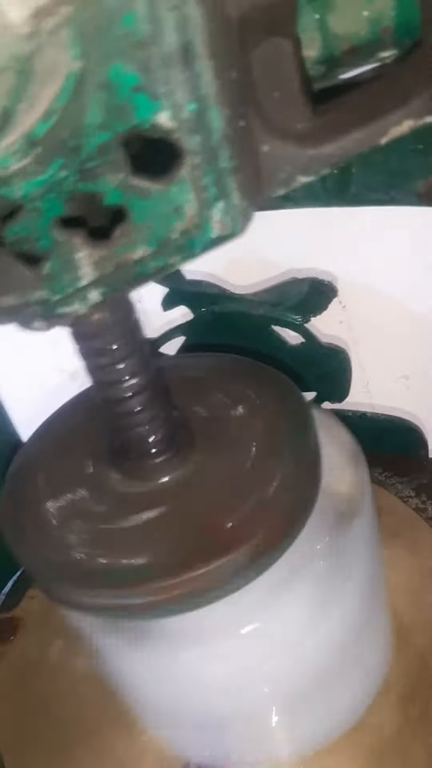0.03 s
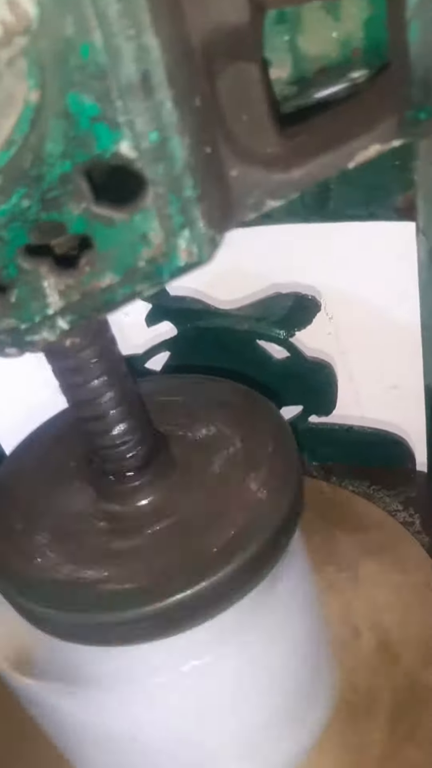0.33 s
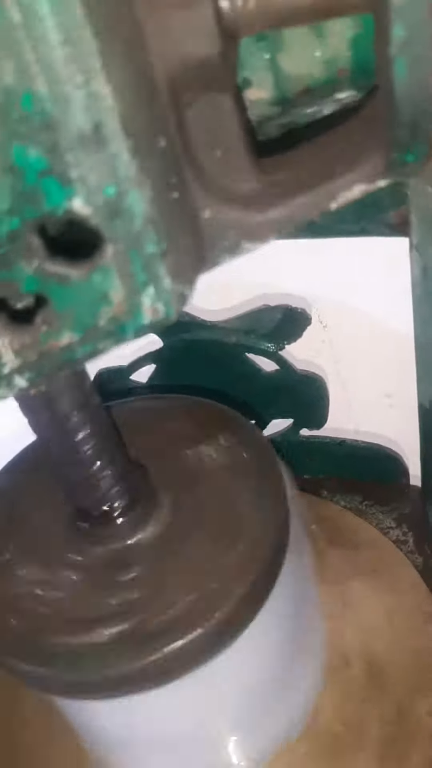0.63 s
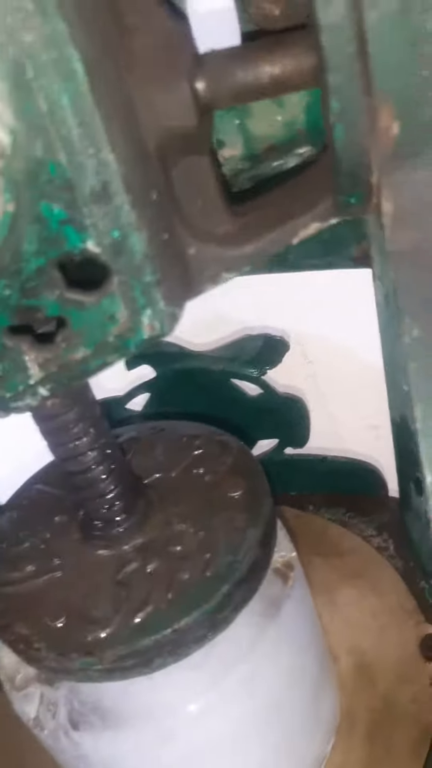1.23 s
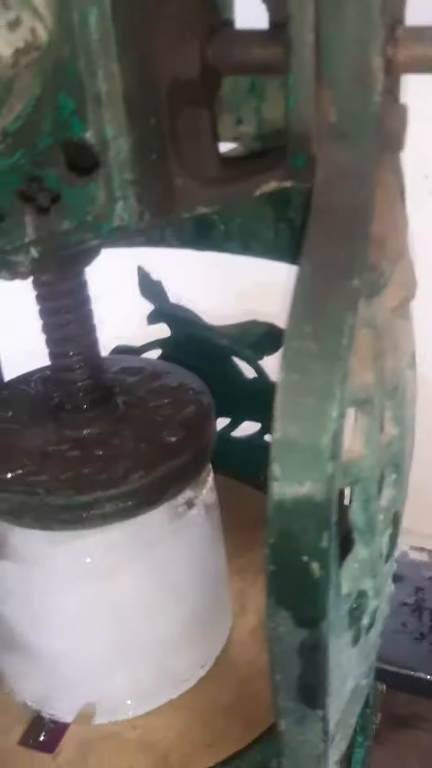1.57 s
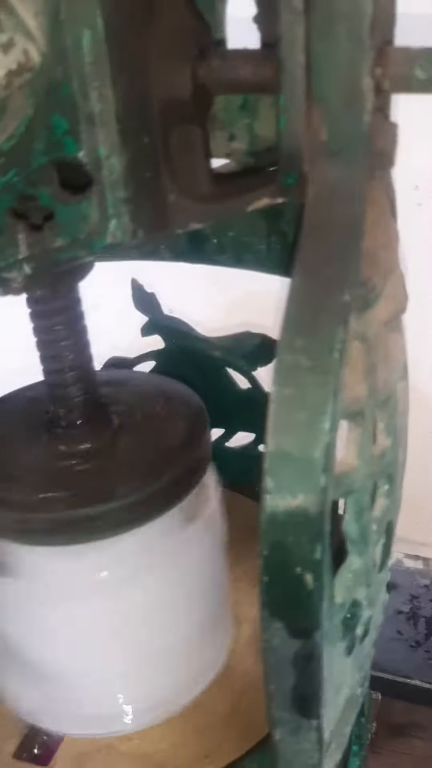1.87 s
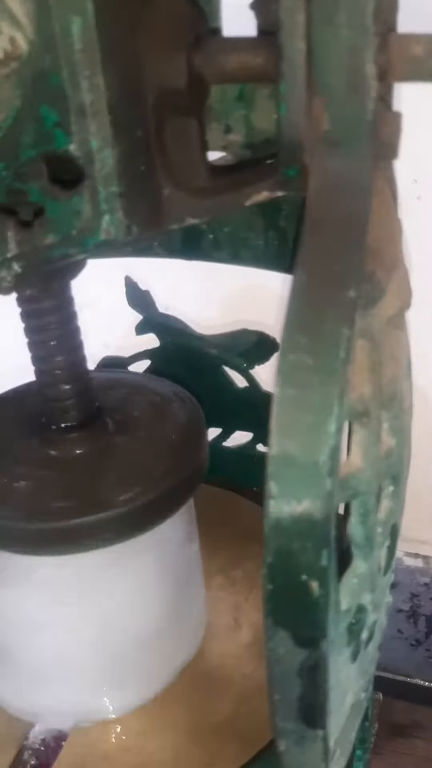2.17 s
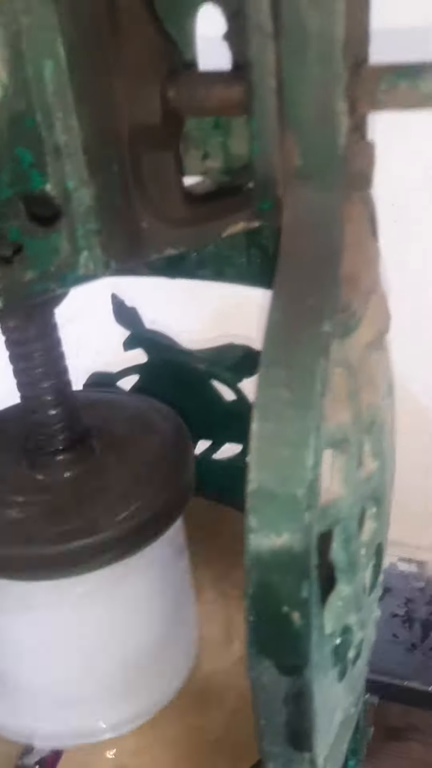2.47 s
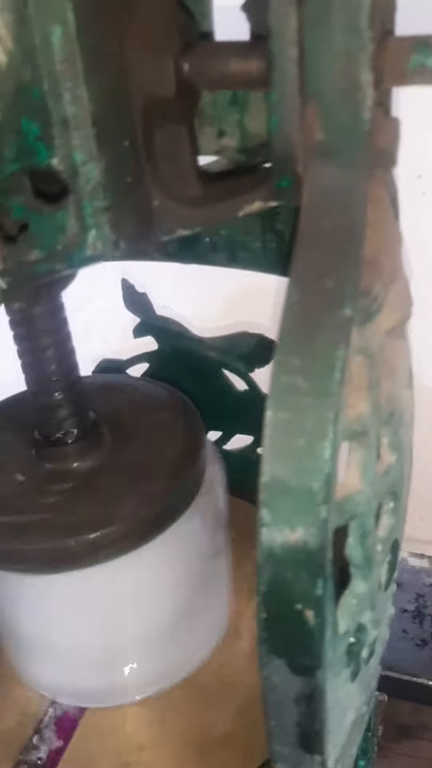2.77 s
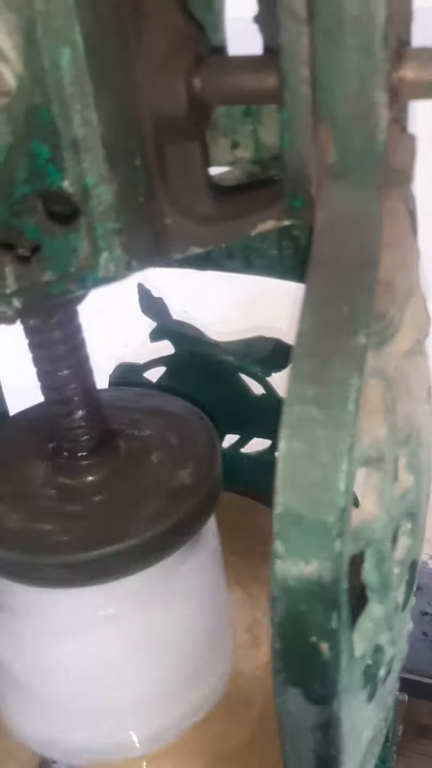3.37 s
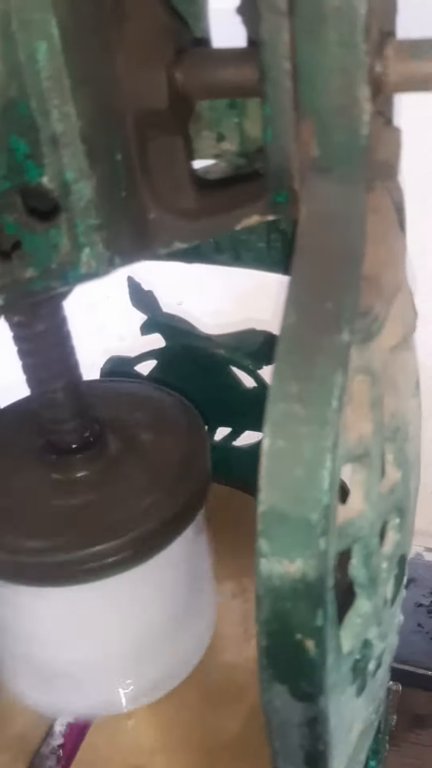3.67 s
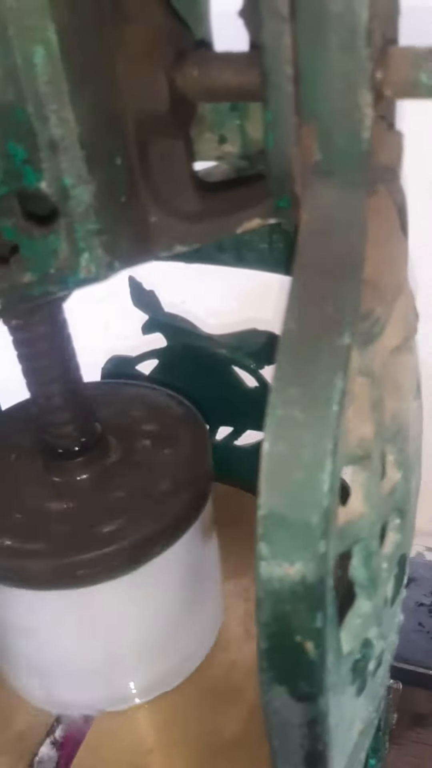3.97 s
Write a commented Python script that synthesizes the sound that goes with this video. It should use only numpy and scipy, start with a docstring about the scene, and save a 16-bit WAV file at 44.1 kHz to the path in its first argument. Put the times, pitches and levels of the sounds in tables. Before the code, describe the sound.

A hand-cranked ice shaver scrapes a block of ice, pauses briefly, then scrapes again.

```python
"""Shaving ice by hand

A hand-cranked cast-iron shaver spins a block of ice over its blade: a dense rain of tiny fractures
that swells where the ice bites, with chips and squeaks. The crank stops, the loose gears knock and
the block rubs faintly; then the blade catches again. Just before that, a finger covers the right
microphone port (its sound hole), muffling it and rumbling against it. The room is quiet."""
import sys
import numpy as np
from scipy import signal
from scipy.fft import rfft, irfft, next_fast_len
from scipy.io import wavfile

SR = 44100
rng = np.random.default_rng(int(sys.argv[2]) if len(sys.argv) > 2 else 0)


def wav_out(sig):
    """Save sig, one row per channel (or a flat mono array), as 16-bit PCM at SR to the path in sys.argv[1]."""
    wavfile.write(sys.argv[1], SR, np.round(np.clip(np.atleast_2d(sig).T, -1, 1) * 32767).astype(np.int16))


N = 176400
TIME = np.arange(N) / SR
COVER_S = 1.6565  # when the finger lands
BASS_CUT_HZ = 220  # knocks and squeaks fade below this pitch

# Pitches at which frame, tray and blade ring: pitch_hz, width_hz, first_lift_db, second_lift_db
RESONANCES = [(315, 4.8, 0.5, 5), (730, 79, 6, 6.5), (830, 120, 4.5, 1.5), (1073, 23, 9.5, -5),
              (1217, 82, 10, 4), (1514, 160, 10, 6), (3267, 70, 7, 3.5), (4380, 100, -1.5, 7.5),
              (4936, 46, 6, 3), (5150, 45, 7.5, 6.5), (12120, 300, 4, 3.5)]
# Tone of the second spell of scraping and of the finger's tap: pitch_hz, level_db
SECOND_COLOUR = [(60, -35), (130, -29.5), (200, -23.5), (290, -10), (420, -6), (620, -8), (850, -2.5),
                 (1020, -7), (1400, -6.5), (2000, -7), (2800, -7), (4700, -2), (6400, -4.5), (7100, -12.5),
                 (7600, -23.5), (8700, -26), (10200, -20.5), (16000, -24)]


def cranking():
    """The crank turns the ice over the blade in two spells, each with its own tone."""
    # How hard the blade bites in each spell: time_s, level_db
    first_bite = [(0.0, -29), (0.062, -37.5), (0.082, -41.5), (0.152, -22), (0.212, -36.5), (0.25, -33),
                  (0.346, -29), (0.36, -20), (0.374, -31), (0.408, -27.5), (0.44, -38), (0.515, -25.5),
                  (0.535, -26.5), (0.565, -23), (0.61, -19), (0.65, -26.5), (0.684, -32), (0.756, -18.5),
                  (0.768, -22), (0.788, -18), (0.835, -42.5)]
    second_bite = [(1.69, -45), (1.7, -23.5), (1.76, -31.5), (1.87, -30.5), (1.91, -17.5), (1.96, -25.5),
                   (2.0, -28), (2.06, -33), (2.11, -21), (2.165, -17.5), (2.2, -28.5), (2.32, -32),
                   (2.405, -25), (2.44, -35), (2.72, -30.5), (2.78, -34.5), (2.835, -25), (2.885, -19),
                   (2.91, -27.5), (3.1, -29.5), (3.14, -37), (3.19, -25), (3.28, -37.5), (3.43, -24.5),
                   (3.52, -29), (3.565, -22.5), (3.59, -32.5), (3.625, -28), (3.645, -40), (3.79, -32),
                   (3.84, -21), (3.915, -20), (3.935, -25.5), (4.0, -29.5)]
    # Grinding carried by the frame in each spell: time_s, level_db
    first_grind = [(0.0, -30.5), (0.04, -28), (0.05, -30), (0.096, -30.5), (0.162, -23.5), (0.21, -30.5),
                   (0.28, -28), (0.324, -28), (0.342, -25), (0.38, -28), (0.45, -24.5), (0.485, -26.5),
                   (0.53, -29), (0.606, -25.5), (0.68, -27.5), (0.778, -22.5), (0.81, -29), (0.835, -43.5)]
    second_grind = [(1.69, -30.5), (1.703, -30), (2.15, -29.5), (2.3, -39.5), (2.39, -33), (2.521, -37),
                    (2.68, -34), (2.97, -36.5), (3.06, -32), (3.135, -38), (3.16, -32), (3.3, -36.5),
                    (3.56, -29), (3.59, -33.5), (3.67, -35.5), (3.7, -29.5), (3.78, -34), (3.89, -28),
                    (3.92, -34), (4.0, -34)]
    # Tone of the first spell of scraping: pitch_hz, level_db
    first_colour = [(60, -30), (130, -19), (190, -14.5), (270, 1), (600, -2.5), (1400, -1.5), (2400, 0),
                    (3500, 3), (4300, 1), (6000, 0), (7300, -24), (8400, -35), (11000, -23.5),
                    (16000, -27.5)]
    _, _, first_lifts, second_lifts = np.transpose(RESONANCES)
    first = shaving(first_bite, first_grind, first_colour, first_lifts,
                    grind_trim_db=2.5, bite_trim_db=2.5, spray_trim_db=-34.5, spray_share=0.6)
    second = shaving(second_bite, second_grind, SECOND_COLOUR, second_lifts,
                     grind_trim_db=4.5, bite_trim_db=5, spray_trim_db=-28, spray_share=0.77)
    return first + second


def shaving(bite, grind, tone, lifts_db, grind_trim_db, bite_trim_db, spray_trim_db, spray_share):
    """One spell: the frame grinds, the blade bites, fine ice sprays and larger chips crack off."""
    times, levels = np.transpose(bite)
    turning = np.interp(TIME, [times[0] - .004, times[0], times[-1], times[-1] + .02], [0, 1, 1, 0])
    bite_db = np.interp(TIME, times, levels)
    grind_db = np.interp(TIME, *np.transpose(grind))
    spray_db = spray_share * (bite_db - levels.mean())  # follows part of the bite's swing
    scrape = machine_body(shimmer(fractures()), tone, lifts_db)
    low, treble = split(scrape, hz=2780, steepness=6.6)
    edge, spray = split(treble, hz=7140, steepness=22)
    judder = drift(rate_hz=29)
    layers = (rms_one(low) * from_db(grind_db + grind_trim_db + 0.75 * judder)
              + rms_one(edge) * from_db(bite_db + bite_trim_db + 1.48 * judder)
              + rms_one(spray) * from_db(spray_db + spray_trim_db + 1.48 * judder))
    return turning * (layers + chips(tone, lifts_db))


def fractures(clicks_per_s=9000, spread_db=1.5):
    """Ice breaks in a dense stereo rain of tiny clicks of uneven size."""
    sizes = from_db(spread_db * np.minimum(rng.exponential(1, (2, N)), 5))
    signs = rng.choice([-1, 1], (2, N))
    breaks = rng.random((2, N)) < clicks_per_s / SR
    return two_ports(sizes * signs * breaks)


def machine_body(x, tone, lifts_db):
    """The machine gives the sound a broad tone, with peaks and dips at its resonances."""
    def gain_at(hz):
        peaks_db = sum(lift / (1 + (2 * (hz - pitch) / width) ** 2)
                       for (pitch, width, _, _), lift in zip(RESONANCES, lifts_db))
        return from_db(at_hz(tone, hz) + peaks_db)
    return rms_one(shape(x, gain_at))


def shimmer(x, depth_db=4, width_hz=62, length_s=0.0085):
    """The moving contact makes narrow bands of pitch swell and fade; the blade rings along."""
    # High pitches shimmer more: pitch_hz, share_of_depth
    depth_shares = [(300, 0.5), (1500, 0.62), (4500, 0.8), (12000, 0.89)]
    hz, times, bands = signal.stft(x, SR, nperseg=512, noverlap=384)
    steps = np.arange(-12, 13)
    pitch_blur = np.exp(-.5 * (steps * hz[1] / width_hz) ** 2)
    time_blur = np.exp(-.5 * (steps * times[1] / length_s) ** 2)
    chance = rng.standard_normal(bands.shape[1:])
    swell = rms_one(signal.fftconvolve(chance, np.outer(pitch_blur, time_blur), "same"))
    gain = from_db(depth_db * at_hz(depth_shares, hz)[:, None] * swell)
    gain /= np.sqrt(np.mean(gain ** 2, axis=1, keepdims=True))  # each band keeps its average power
    bands = bands * gain * from_db(blade_ring_db(hz, times))
    return signal.istft(bands, SR, nperseg=512, noverlap=384)[1][:, :N]


def blade_ring_db(hz, times, width_hz=110):
    """The blade's own ring shifts and fades as the block presses on it."""
    centre_hz = 3580 + 45 * np.interp(times, TIME, drift(rate_hz=20))
    lift_db = 7.5 + 2.5 * np.interp(times, TIME, drift(rate_hz=20))
    return lift_db / (1 + (2 * (hz[:, None] - centre_hz) / width_hz) ** 2)


def chips(tone, lifts_db):
    """Chips crack off at the blade, too small to make bass."""
    # Each crack: start_s, level_db
    cracks = [(0.192, -16.5), (0.266, -24), (0.357, -24), (0.747, -15.5), (0.786, -29), (1.707, -5),
              (2.167, -17.5), (2.681, -18), (3.235, -12.5), (3.616, -12.5), (3.701, -15.5), (3.913, -20)]
    level = sum(from_db(db) * burst(start, rise_s=0.00046, decay_s=0.0053) for start, db in cracks)
    return cut(level * machine_body(fractures(), tone, lifts_db), 1200, "high")


def squeaks():
    """The ice sticks and slips on the blade: each burst of friction sings at its own pitch."""
    # Squeaks and pitched crunches: start_s, pitch_hz, peak_db
    slips = [(0.0, 1550, -16.5), (0.002, 1253, -17.5), (0.026, 1487, -15.5), (0.189, 2535, -16),
             (0.241, 1230, -16.5), (0.262, 1485, -12.5), (0.333, 2110, -15.5), (0.461, 1350, -20.5),
             (0.534, 742, -17.5), (0.542, 3930, -21.5), (0.586, 780, -21.5), (0.745, 3530, -6.5),
             (0.781, 3240, -12), (0.835, 1010, -27.5), (3.153, 800, -20), (3.618, 1820, -20.5)]
    friction, out = rng.standard_normal(N), 0
    for start, hz, db in slips:
        voice = ring(friction * burst(start, rise_s=0.0013, decay_s=0.0082), hz, ring_s=.035)
        out = out + from_db(db) * voice / np.abs(voice).max()
    return cut(out, BASS_CUT_HZ, "high", order=2)


def gear_knocks(level_db=-23, click_db=10, grit_db=-5.5):
    """Each knock of the loose gears is a short chatter of contacts that rings the iron."""
    # Each knock: start_s, level_db, decay_s, brightness_hz
    knocks = [(0.74, -15.5, 0.045, 460), (0.773, -37, 0.013, 600), (0.831, -17, 0.0031, 1500),
              (0.841, -19, 0.0062, 7050), (0.889, -12.5, 0.0027, 503), (0.8949, -16.5, 0.0045, 3970),
              (0.913, -21, 0.0051, 1700), (0.951, -21, 0.014, 300), (0.971, -36, 0.01, 1700),
              (0.998, -38, 0.0086, 2660), (1.07, -44, 0.005, 900)]
    # The notes of the iron gears: pitch_hz, level_db, ring_s
    gear_notes = [(333, -4.5, 0.018), (470, -0.5, 0.0098), (792, 2.5, 0.017), (1030, 2.5, 0.0082),
                  (1415, -4, 0.0077), (2113, 5, 0.019), (2780, -7, 0.012), (3110, -2.5, 0.014),
                  (4010, 1.5, 0.015), (5200, 3.5, 0.0061), (7050, -6, 0.014)]
    contacts = fractures()
    grit = from_db(grit_db) * cut(contacts, 11700, "high")
    force = 0
    for start, db, decay_s, hz in knocks:
        thud = cut(contacts, hz, "low", order=2) * (1 + 1800 / hz) ** .5  # dull knocks push harder
        hiss = grit * hz / (hz + 1500)  # bright knocks carry more grit
        force = force + from_db(db) * burst(start, 0.0027, decay_s) * (thud + hiss)
    iron = sum((-1) ** k * from_db(db) * ring(force, hz, ring_s)
               for k, (hz, db, ring_s) in enumerate(gear_notes))
    return from_db(level_db) * cut(iron + from_db(click_db) * force, BASS_CUT_HZ, "high", order=3)


def rubbing():
    """The block rubs and slips faintly while the crank rests."""
    # Swells of friction: middle_s, half_length_s, level_db
    rubs = [(1.111, 0.03, -52.5), (1.289, 0.0072, -39), (1.359, 0.033, -52), (1.584, 0.056, -54.5)]
    # Tone of the rubbing: pitch_hz, level_db
    rub_colour = [(200, -27.5), (700, 2.5), (1600, 1.5), (2700, 5), (6000, -1.5), (8000, -13.5),
                  (16000, -19)]
    level = 0
    for middle, half_length, db in rubs:
        offset = (TIME - middle) / half_length
        level = level + from_db(db) / (1 + offset ** 2) ** .5 * np.exp(-(offset / 1.3) ** 4)
    return level * rms_one(colour(shimmer(fractures()), rub_colour))


def finger_tap():
    """The finger lands on the microphone's case with a click."""
    click = from_db(-24) * burst(COVER_S, rise_s=0.00047, decay_s=.005)
    tail = from_db(-35) * burst(COVER_S, rise_s=.0003, decay_s=.035)
    return (click + tail) * rms_one(colour(rng.standard_normal((2, N)), SECOND_COLOUR))


def finger_rumble():
    """The finger rumbles against the port it covers."""
    # Strength of the rumble: time_s, level_db
    rumble_levels = [(1.65, -46), (1.658, -37.5), (1.69, -53), (2.19, -53), (2.25, -39), (2.33, -51),
                     (2.41, -40), (2.5, -56.5), (4.0, -57)]
    # Its deep tone: pitch_hz, level_db
    rumble_colour = [(20, -8), (50, -0.5), (130, -1), (200, -13.5), (1500, -47)]
    level = from_db(np.interp(TIME, *np.transpose(rumble_levels)))
    return level * rms_one(colour(rng.standard_normal(N), rumble_colour))


def room_echo(x, level_db=-21.5, ring_s=0.31):
    """The room adds a faint, short, dull tail."""
    fade = from_db(-60 * TIME[:SR // 2] / ring_s)
    tail = cut(rng.standard_normal((2, SR // 2)), 2700, "low", order=1) * fade
    tail /= np.sqrt(np.sum(tail[0] ** 2))
    return from_db(level_db) * signal.fftconvolve(x, tail, axes=1)[:, :N]


def room_noise(level_db=-59):
    """The low, steady hush of the quiet room."""
    # Tone of the hush: pitch_hz, level_db
    hush_colour = [(25, -14), (60, -6.5), (105, 3), (200, -16.5), (420, 1), (700, -8), (1200, -15),
                   (6000, -20), (8500, -27)]
    return from_db(level_db) * rms_one(colour(two_ports(rng.standard_normal((2, N))), hush_colour))


def two_ports(pair):
    """Blend two unrelated signals into a left and right that are alike in the bass."""
    # How alike the two sides are (1 is the same): pitch_hz, likeness
    likeness = [(100, 0.88), (300, 1), (800, 0.47), (1080, 0.069), (1500, 0.59), (3000, 0.15),
                (5000, 0.058)]

    def alike(hz):
        return np.clip(at_hz(likeness, hz), -.98, .98)
    mid = shape(pair[0], lambda hz: np.sqrt(1 + alike(hz)))
    side = shape(pair[1], lambda hz: np.sqrt(1 - alike(hz)))
    return rms_one(np.array([mid + side, mid - side]))


def from_db(db):
    """Turn decibels into a gain."""
    return 10 ** (np.asarray(db) / 20)


def rms_one(x):
    """Scale to an average power of one."""
    return x / np.sqrt(np.mean(x ** 2) + 1e-20)


def at_hz(points, hz):
    """Read between a table's rows, with octaves evenly spaced."""
    pitches, values = np.transpose(points)
    return np.interp(np.log(hz + 1e-3), np.log(pitches), values)


def shape(x, gain_at):
    """Give each pitch its own gain, with no ringing ahead of a sound (minimum phase)."""
    size = next_fast_len(N + SR // 4, True) // 2 * 2
    hz = np.arange(size // 2 + 1) * SR / size
    cepstrum = irfft(np.log(gain_at(hz) + 1e-6))
    cepstrum[1:size // 2] *= 2
    cepstrum[size // 2 + 1:] = 0
    return irfft(rfft(x, size) * np.exp(rfft(cepstrum)))[..., :N]


def colour(x, points):
    """Set the tone from a table of pitch_hz, level_db."""
    return shape(x, lambda hz: from_db(at_hz(points, hz)))


def cut(x, hz, keep, order=4):
    """Keep the "low" or the "high" side of a pitch."""
    sections = signal.butter(order, np.clip(hz, 10, .45 * SR), keep, fs=SR, output="sos")
    return signal.sosfilt(sections, x + 1e-18)


def split(x, hz, steepness):
    """Divide a steady sound smoothly into what lies below and above a pitch."""
    pitches = np.arange(N // 2 + 1) * SR / N
    low = irfft(rfft(x) / (1 + (pitches / hz) ** steepness), N)
    return low, x - low


def drift(rate_hz):
    """A slow random wobble with a typical size of one."""
    return rms_one(cut(rng.standard_normal(N + SR), rate_hz, "low", order=2)[SR:])


def ring(x, hz, ring_s):
    """Ring at one pitch, fading by 60 dB in ring_s."""
    fade = from_db(-60 / (ring_s * SR))
    angle = 2 * np.pi * hz / SR
    return signal.lfilter([0, np.sin(angle)], [1, -2 * fade * np.cos(angle), fade * fade], x + 1e-18)


def burst(start_s, rise_s, decay_s):
    """A level that rises in a straight line, then dies away."""
    age = TIME - start_s
    return np.clip(age / rise_s, 0, 1) * np.exp(-np.maximum(age - rise_s, 0) / decay_s)


def scene():
    """Two spells of shaving with a pause between them, in a quiet room."""
    machine = cranking() + squeaks() + gear_knocks() + rubbing()
    return machine + room_noise() + room_echo(machine) + finger_tap()


def record(dry, covering_s=0.0037, top_hz=16100):
    """A finger muffles the right port part-way through; both sides lose their highest treble."""
    # Tone of the right port, open and covered: pitch_hz, level_db
    open_port = [(200, -0.5), (380, -4.5), (520, 2.5), (800, 0), (3000, 1.5), (5000, -3.5), (8000, -9),
                 (14000, -2)]
    covered_port = [(100, -26), (280, -50), (1000, -28.5), (1500, -26.5), (2500, -17), (3800, -23.5),
                    (5000, -39.5), (14000, -33.5)]
    covered = np.clip((TIME - COVER_S) / covering_s + 1, 0, 1)
    muffled = colour(dry[1], covered_port) + finger_rumble()
    right = (1 - covered) * colour(dry[1], open_port) + covered * muffled
    treble_cut = signal.ellip(12, .2, 80, top_hz, fs=SR, output="sos")
    return signal.sosfilt(treble_cut, np.array([dry[0], right]))


dry = scene()
out = record(dry)
wav_out(out)
```